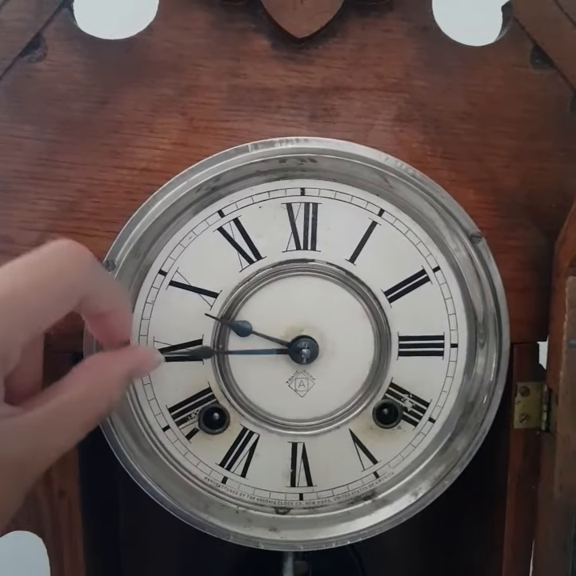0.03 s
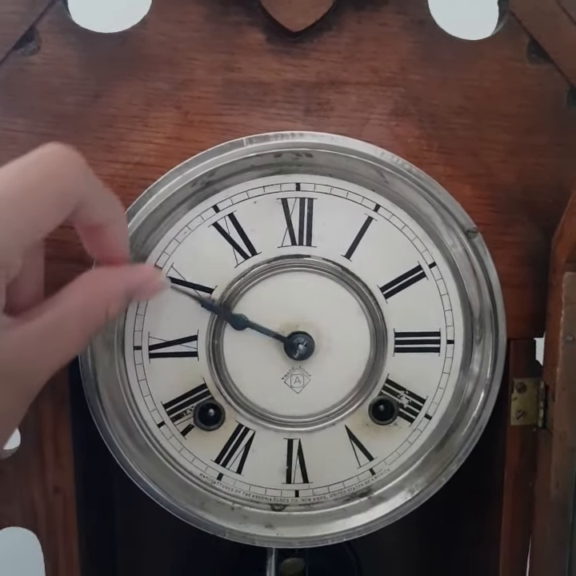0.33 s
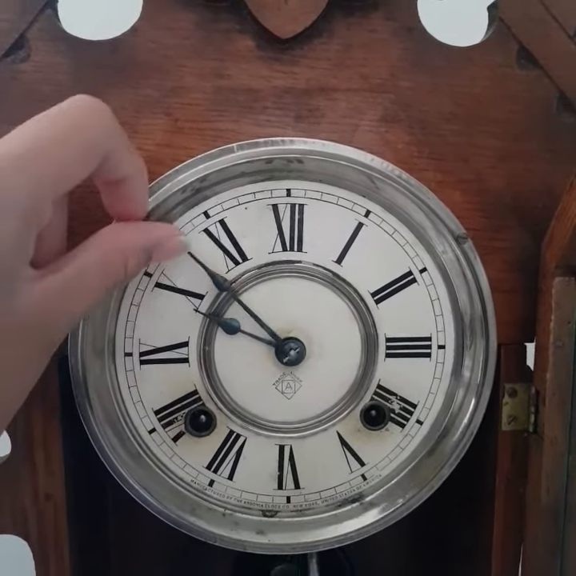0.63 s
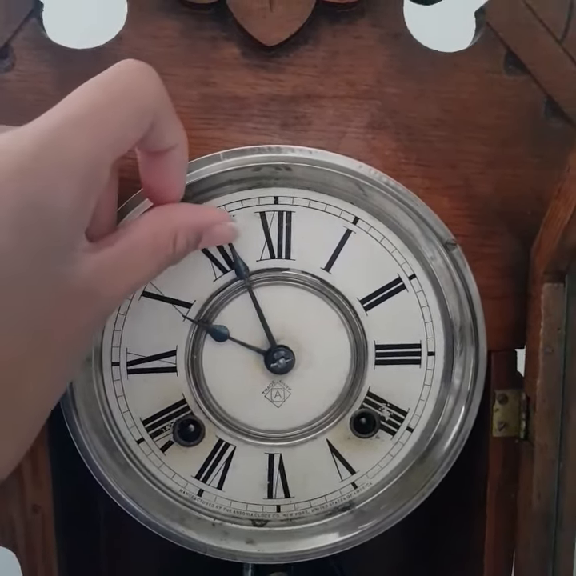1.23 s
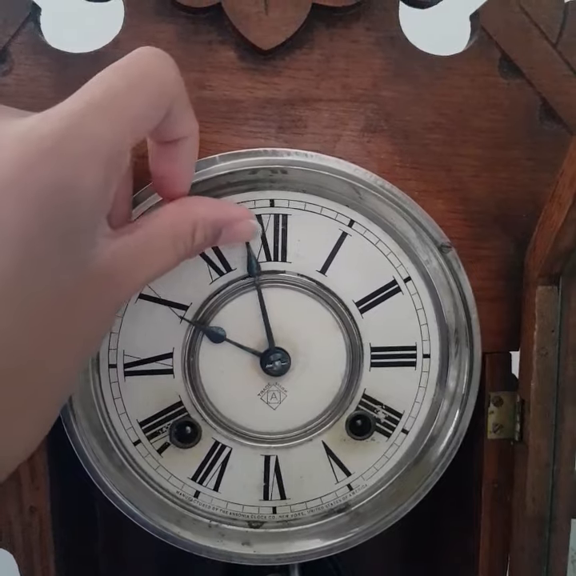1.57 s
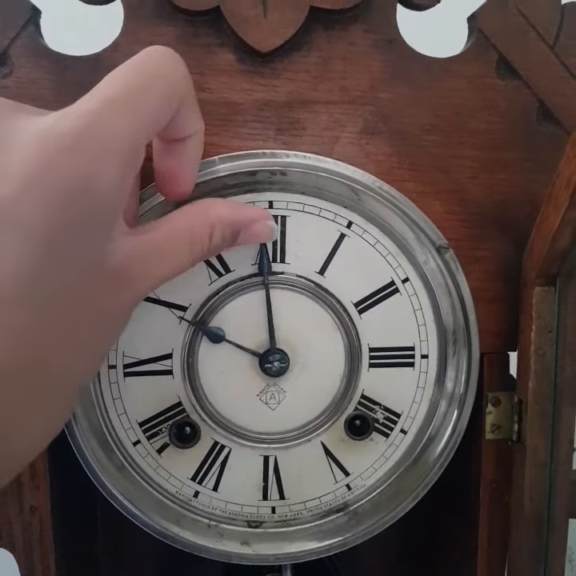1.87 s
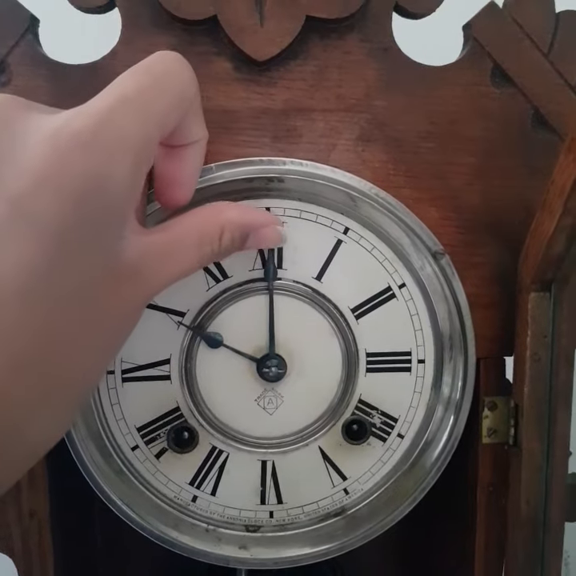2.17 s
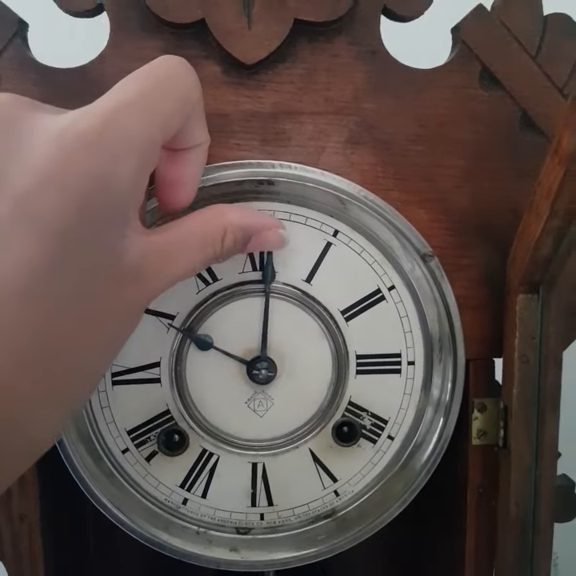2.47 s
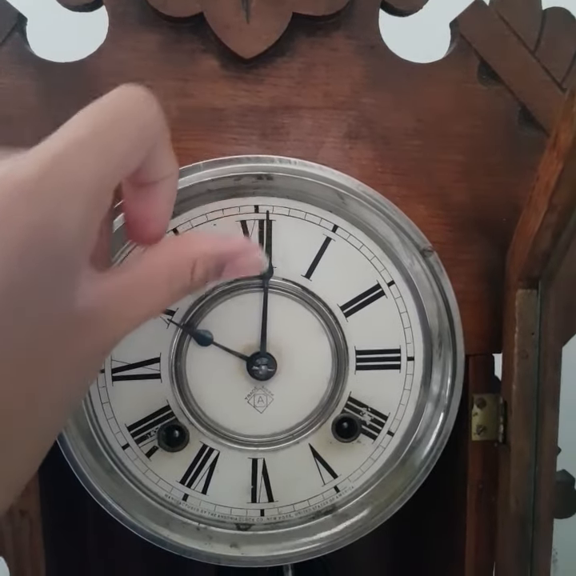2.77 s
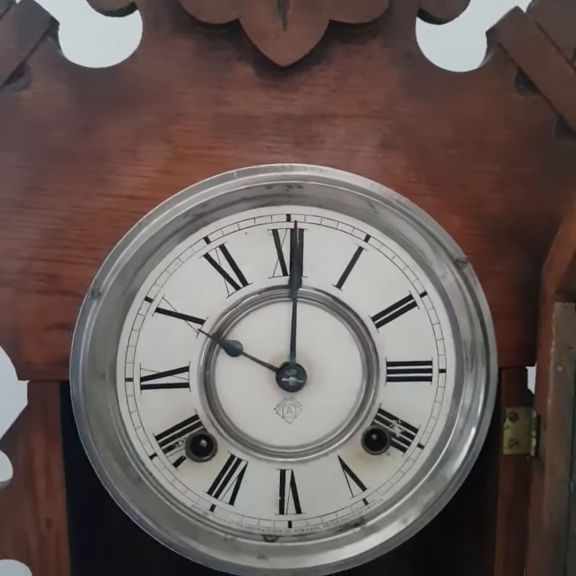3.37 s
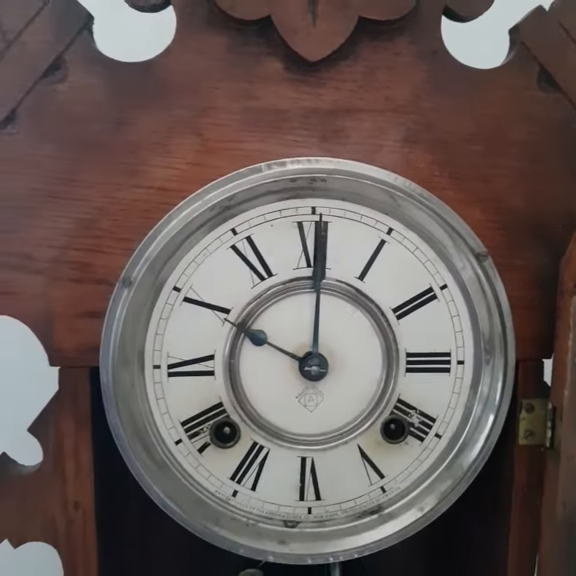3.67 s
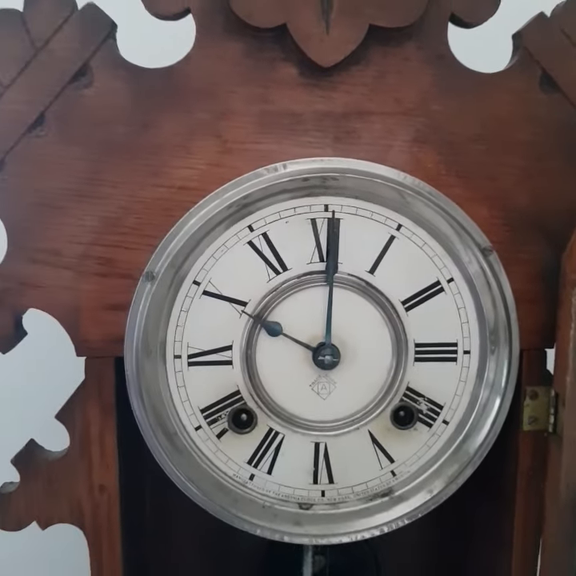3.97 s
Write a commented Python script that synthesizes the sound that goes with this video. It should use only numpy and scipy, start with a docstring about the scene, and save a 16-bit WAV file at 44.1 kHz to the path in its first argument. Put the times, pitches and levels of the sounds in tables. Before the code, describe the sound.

An antique clock ticks close by in a quiet room, over a fading low gong tone. Its gears whirr briefly and stop with a click, then rattle again for longer, and the gong is struck once.

```python
"""A quiet room, with a stereo pair close to an antique mantel clock that is being set forward to the hour.
The pendulum's escapement ticks, a finger rubs as it pushes the minute hand, and the coiled gong still
rings from an earlier stroke. The strike train runs briefly and is caught by the warning lever;
at the hour it is released, the gears whirr and lift the hammer, and the gong is struck."""
import sys
import numpy as np
from scipy import signal
from scipy.fft import rfft, irfft, next_fast_len
from scipy.io import wavfile

SR = 44100
rng = np.random.default_rng(int(sys.argv[2]) if len(sys.argv) > 2 else 0)


def waveform_to_disk(signal):
    """Save audio, clipped to [-1, 1], as 16-bit WAV at the path in sys.argv[1]."""
    frames = np.transpose(np.atleast_2d(signal))
    scaled = np.clip(frames, -1, 1) * 32767
    samples = np.round(scaled).astype(np.int16)
    wavfile.write(sys.argv[1], SR, samples)


N = 176400

# Hammer strokes on the gong. Each row: time in seconds (negative is earlier), gain in dB.
STROKES = [(-2.5, -2), (3.9098, 0)]


def amp(db):
    """Decibels to gain."""
    return 10 ** (np.asarray(db) / 20)


def unit(x):
    """Scale to rms 1."""
    return x / np.sqrt(np.mean(x ** 2) + 1e-20)


def along(points, hz):
    """Read (Hz, value) points on a log frequency axis."""
    freqs, values = np.transpose(points)
    return np.interp(np.log(hz + 1), np.log(freqs + 1), values)


def curve(points):
    """Join (seconds, value) points, one value per sample."""
    return np.interp(np.arange(N) / SR, *np.transpose(points))


def swells(rows):
    """Bell-shaped gain from (centre in seconds, half length in seconds, dB) rows."""
    t = np.arange(N) / SR
    return sum(amp(db) * np.exp(-((t - centre) / half) ** 2) for centre, half, db in rows)


def sides(pan_db):
    """Left and right gains of mean power 1; a positive pan leans left."""
    gains = amp(np.array([pan_db, -pan_db]) / 2)
    return gains / np.sqrt(np.mean(gains ** 2, axis=0))


def filtered(x, response):
    """Pass x through a complex frequency response."""
    n = x.shape[-1]
    size = 2 * next_fast_len(n // 2 + SR // 16)
    return irfft(rfft(x, size) * response(np.fft.rfftfreq(size, 1 / SR)), size)[..., :n]


def colour(points):
    """Minimum-phase response with the gain of (Hz, dB) points."""
    def response(hz):
        cepstrum = irfft(np.log(amp(along(points, hz))))
        half = len(cepstrum) // 2
        return np.exp(rfft(np.r_[cepstrum[0], 2 * cepstrum[1:half], np.zeros(half)]))
    return response


def body(modes):
    """Response of (Hz, width in Hz, dB) resonances, summed with alternating signs."""
    return lambda hz: sum((-1) ** k * amp(db) * 1j * hz * width / (centre**2 - hz**2 + 1j * hz * width)
                          for k, (centre, width, db) in enumerate(modes))


def contact(start, db, response, t60, scrape):
    """A blow and its scrape, dying in t60 seconds, through a response; db is the level over 10 ms."""
    t = np.arange(SR // 6) / SR
    friction = rng.standard_normal(len(t)) * amp(-60 * t / t60)
    push = scrape * friction / np.linalg.norm(friction) + (t == 0)
    ring = filtered(push, response)
    out = np.zeros(N + SR)
    out[round(start * SR):][:len(t)] = amp(db) * ring / np.linalg.norm(ring) * np.sqrt(SR / 100)
    return out[:N]


def background():
    """Room tone: a low wavering rumble, nearly mono, and a faint wide hiss."""
    # Two spectra. Each row: frequency in Hz, relative level in dB.
    rumble_tone = [(20, -10), (34, -19.5), (49, 4), (72, -8), (120, -16), (250, -32.5), (500, -40),
                   (2000, -69)]
    hiss_tone = [(100, 13.5), (500, -5.5), (1400, -3.5), (2300, -4.5), (3500, -11), (5500, -14.5),
                 (7800, -24), (11000, -8), (15500, -6)]
    # The rumble's rise and fall. Each row: time in seconds, level in dB.
    rumble_level = [(0, -61), (.95, -62.5), (1.3, -56.5), (1.9, -58), (2.3, -67), (2.8, -60.5), (4, -59)]
    narrow_noise = rng.standard_normal(N) + 0.16 * rng.standard_normal((2, N))
    rumble = unit(filtered(narrow_noise, colour(rumble_tone)))
    hiss = unit(filtered(rng.standard_normal((2, N)), colour(hiss_tone)))
    return amp(curve(rumble_level)) * rumble + amp(-67) * sides(pan_db=-0.5)[:, None] * hiss


def room(x):
    """The walls return a short diffuse tail, different at each microphone."""
    # Reverberation. Each row: frequency in Hz, seconds to fall 60 dB.
    decay = [(200, 0.33), (2000, 0.17), (4500, 0.14), (12000, 0.078)]
    hz, t, noise = signal.stft(rng.standard_normal((2, SR // 2)), SR, nperseg=256)
    tail = signal.istft(noise * amp(-60 * t / along(decay, hz)[:, None]), SR, nperseg=256)[1]
    return signal.fftconvolve(x[None], tail / np.linalg.norm(tail[0]), axes=1)[:, :N]


def finger():
    """Skin rubs in soft swells as a finger pushes the minute hand."""
    # Rubs. Each row: centre in seconds, half length in seconds, level in dB.
    rubs = [(0.368, 0.037, -65), (0.549, 0.053, -63.5)]
    # Skin friction. Each row: frequency in Hz, relative level in dB.
    skin_tone = [(100, 4), (300, -2), (420, -6), (600, -11.5), (1500, -3.5), (3000, -35), (9000, -33)]
    return swells(rubs) * unit(filtered(rng.standard_normal(N), colour(skin_tone)))


def escapement():
    """Each beat rings the plates and the escape wheel, then a pallet lands with a brighter click."""
    # Each row: start in seconds, plate and wheel levels in dB, pallet delay in seconds, its level in dB.
    beats = [(.178, -48.5, -60, 0.018, -56.5), (.687, -47.5, -69, 0.0042, -70),
             (1.1535, -43.5, -61, 0.0086, -53), (1.661, -50, -68, 0.012, -75),
             (2.131, -47.5, -57, 0.013, -54.5), (2.642, -43, -68, 0.0092, -51.5),
             (3.112, -46, -60, 0.0044, -67), (3.62, -47, -73, 0.0042, -60)]
    # Resonances. Each row: frequency in Hz, width in Hz, gain in dB.
    plate_modes = [(352, 58, -7), (692, 23, 0.5), (816, 23.7, 6.5), (1325, 175, -3.5), (2020, 42, 4.5),
                   (2233, 49, 4.5), (2716, 164, -7), (4200, 640, -16.5)]
    wheel_modes = [(4150, 220, -1), (4526, 160, 2.5)]
    # The pallet's click. Each row: frequency in Hz, relative level in dB.
    pallet_tone = [(300, -25), (900, -19), (2300, 3), (4500, -11), (7500, -15.5), (9300, 3.5), (12000, -6),
                   (14500, -2)]
    return sum(contact(start, plate_db, body(plate_modes), t60=0.087, scrape=1.9)
               + contact(start, wheel_db, body(wheel_modes), t60=0.035, scrape=3)
               + contact(start + delay, pallet_db, colour(pallet_tone), t60=0.058, scrape=4.7)
               for start, plate_db, wheel_db, delay, pallet_db in beats)


def levers():
    """Levers drop, bounce and catch: a thud in the wooden case, their own ring and a dry click."""
    # Each row: start in seconds, then the levels of thud, ring and click in dB.
    landings = [(1.0427, -51, -58, -43.5), (1.0445, -35.5, -56, -43), (1.049, -40.5, -60, -58),
                (2.346, -56.5, -44, -52), (2.369, -55, -44.5, -55), (3.8694, -42, -50, -37.5)]
    # Resonances. Each row: frequency in Hz, width in Hz, gain in dB.
    case_modes = [(229.3, 15, -8), (311, 21, -4), (415.4, 16, -1.5), (574, 11, -1.5), (649, 47, -6),
                  (836, 19, -2), (1310, 990, -27), (2030, 100, -4.5), (2295, 260, -9), (2490, 100, -9.5)]
    lever_modes = [(402, 21, -3.5), (1244, 26, 9), (1890, 280, -13.5), (2140, 200, -11), (2445, 120, -10.5),
                   (5360, 56, -21)]
    # The click. Each row: frequency in Hz, relative level in dB.
    click_tone = [(500, -3.5), (2500, -10.5), (4200, -11.5), (6200, 1), (7800, -11), (10500, 3.5),
                  (12500, -7), (15500, -7)]
    return sum(contact(start, thud_db, body(case_modes), t60=0.05, scrape=0.56)
               + contact(start, ring_db, body(lever_modes), t60=0.044, scrape=1.8)
               + contact(start, click_db, colour(click_tone), t60=0.03, scrape=2.1)
               for start, thud_db, ring_db, click_db in landings)


def tooth_impacts():
    """Gear teeth meet unevenly and chatter in their play, giving a train of impulses."""
    # The train's speed. Each row: time in seconds, teeth per second.
    tooth_rate = [(1.0, 84), (2.4, 63.3), (2.6, 71.4), (3.1, 69), (3.8, 61.8)]
    scatter_s, spread_db, chatter_per_s, chatter_db = 0.0013, 2.6, 1200, -12
    teeth_passed = np.floor(np.cumsum(curve(tooth_rate)) / SR)
    due = np.flatnonzero(np.diff(teeth_passed))
    lateness, force = np.clip(rng.standard_normal((400, 2)), -2, 2)[:len(due)].T
    onsets = np.clip(due + lateness * scatter_s * SR, 0, N - 1).astype(int)
    chatter = amp(chatter_db) * rng.standard_normal(N) * (rng.random(N) < chatter_per_s / SR)
    return np.bincount(onsets, amp(spread_db * force), N) + chatter


def strike_train():
    """Tooth impacts rattle the gears; the dry pivots fizz with every impact and squeak in bursts."""
    # When the train turns. Each row: start and end in seconds.
    runs = [(.7, 1.05), (2.39, 4.0)]
    # Each row: time in seconds, level in dB.
    rattle_level = [(.7, -66), (.76, -64.5), (.86, -64.5), (.95, -55.5), (1.04, -56.5), (1.06, -80),
                    (2.38, -95), (2.41, -63), (2.5, -55.5), (2.72, -49), (2.92, -48), (3.15, -50.5),
                    (3.4, -52), (3.55, -50.5), (3.7, -47.5), (3.86, -44.5)]
    fizz_level = [(.7, -82), (.84, -79.5), (.95, -64.5), (1.04, -66), (1.07, -97), (2.38, -74), (2.42, -71),
                  (2.6, -59.5), (3.0, -58), (3.45, -57), (3.62, -59), (3.86, -56), (3.93, -51)]
    # Resonances. Each row: frequency in Hz, width in Hz, gain in dB.
    gear_modes = [(787, 27, -2.5), (1147, 47, -4.5), (1524, 62, 1), (1784, 125, -6), (1981, 125, 2.5),
                  (2121, 167, 1.5), (2824, 485, -17), (3890, 86, -20.5), (5850, 380, -17.5)]
    pivot_modes = [(10280, 72, 0)]
    # Pivot friction. Each row: frequency in Hz, relative level in dB.
    pivot_tone = [(200, -1), (600, 3.5), (1500, 3), (3500, -20), (5700, 3), (7700, -8.5), (9000, 0.5),
                  (10400, 3.5), (12000, -3), (15500, -7.5)]
    # Each row: centre in seconds, half length in seconds, level in dB.
    squeaks = [(2.725, 0.0092, -60), (2.91, 0.02, -60), (3.02, 0.061, -66), (3.37, 0.024, -67),
               (3.6, 0.013, -61), (3.715, .02, -56.5)]
    impacts = tooth_impacts()
    relax_s = 0.0016  # each impact briefly loads the rubbing surfaces
    load = unit(np.sqrt(signal.lfilter([1], [1, -np.exp(-1 / (relax_s * SR))], impacts ** 2)))
    rattle = unit(filtered(unit(impacts) + 0.69 * load * rng.standard_normal(N), body(gear_modes)))
    grit = (load + 0.11) * rng.standard_normal(N)
    squeak = unit(filtered(grit, body(pivot_modes)))
    fizz = unit(filtered(grit, colour(pivot_tone))) + amp(-10) * squeak
    whirr = amp(curve(rattle_level)) * rattle + amp(curve(fizz_level)) * fizz
    t = np.arange(N) / SR
    turning = sum((t > start) & (t < end) for start, end in runs)
    return turning * (whirr + swells(squeaks) * squeak)


def hard_knocks():
    """Now and then a tooth slams across its play and rings its wheel."""
    # Each row: start in seconds, level in dB.
    knocks = [(.8295, -52), (.929, -53.5), (2.417, -51.5), (2.463, -46), (2.498, -47), (2.53, -48.5),
              (2.6165, -45), (2.692, -46), (2.763, -47), (2.85, -44), (2.9055, -42), (2.9345, -50),
              (3.094, -49), (3.1625, -48), (3.211, -46.5), (3.452, -45), (3.686, -49), (3.829, -54),
              (3.839, -46)]
    # Resonances. Each row: frequency in Hz, width in Hz, gain in dB.
    wheel_modes = [(1583, 93, -11.5), (2013, 203, 1), (2130, 130, 4), (5900, 280, -18)]
    return sum(contact(start, db, body(wheel_modes), t60=0.023, scrape=0.99) for start, db in knocks)


def hammer():
    """The hammer's short buzz against the coil, and the jangle it leaves."""
    # Two spectra. Each row: frequency in Hz, relative level in dB.
    buzz_tone = [(100, -35), (350, 17.5), (1200, -5), (2200, 3), (4000, -19), (7500, -17), (9000, -21),
                 (10000, 11.5), (11500, -22), (15500, -11)]
    jangle_tone = [(100, -27), (400, -8), (2200, -5), (3200, -15), (5000, -16), (8000, -26), (10000, -8),
                   (14000, -1), (15500, -22)]
    start, db = STROKES[-1]
    buzz = contact(start, db - 26.5, colour(buzz_tone), t60=0.042, scrape=11)
    jangle = contact(start, db - 43, colour(jangle_tone), t60=0.4, scrape=21.2)
    return buzz + jangle


def gong_modes():
    """The coil has long low modes and brief upper ones spaced as in a stiff rod; each beats with a twin."""
    # Each row: frequency in Hz, level in dB, seconds to fall 60 dB, left over right in dB.
    low_modes = [(156.3, -46, 11, -6), (198.2, -46, 9.8, 8.5), (241.6, -37.5, 7.4, -4),
                 (288, -38.5, 4.3, 4), (341, -31, 3.4, -6), (400, -31.5, 3.1, -7), (458, -36.5, 3.4, -10),
                 (528, -36.5, 3.0, 1), (599, -36.5, 3.4, -3), (676, -30.5, 3.0, -5), (754, -42, 4.3, 1),
                 (840, -43.5, 3.2, -2), (929, -41.5, 4.2, -3), (1018, -42, 8.4, -2),
                 (1115, -31.7, 8.78, -6.5), (1214, -34, 10.4, -16), (1315, -47, 11.5, -3.5),
                 (1412, -49, 6.5, -11), (1532, -40, 7.2, -14), (1648, -46, 4.6, -2), (1765, -39, 6.2, -27),
                 (1886, -48, 7.6, -10), (2012, -33, 6.76, -21.5), (2141, -36.3, 7.5, -30),
                 (2272, -37.7, 7.7, -30), (2406, -48, 5.6, -7), (2541, -54, 6.2, -2),
                 (2686, -45.5, 4.6, -19), (2832, -41, 3.6, -13), (2982, -45.5, 3.0, -7),
                 (3133, -43.5, 2.8, -16), (3289, -46, 2, -22)]
    # Spacing of the upper modes. Each row: mode number, frequency in Hz.
    ladder = [(0, 3440), (6, 4440), (37, 11619), (49, 15195)]
    # Their strength. Each row: frequency in Hz, relative level in dB.
    upper_level = [(3440, -64), (3770, -56), (4150, -56), (4900, -65), (5500, -58), (6300, -65),
                   (7200, -68), (8200, -59), (9700, -55), (10600, -53), (12200, -47), (14500, -50),
                   (15300, -61)]
    # Their place between the microphones. Each row: frequency in Hz, left over right in dB.
    upper_pan = [(3900, 2), (5800, -3), (12000, -8)]
    upper_t60, lift_db, scatter_db = 0.5, 3, 2
    twin_ratio, twin_db = 0.989, -13
    number, rung_hz = np.transpose(ladder)
    upper_hz = np.interp(np.arange(number[-1] + 1), number, np.sqrt(rung_hz)) ** 2
    level_scatter, pan_scatter = scatter_db * rng.standard_normal((len(upper_hz), 2)).T
    levels = lift_db + along(upper_level, upper_hz) + level_scatter
    pans = along(upper_pan, upper_hz) + pan_scatter
    modes = list(low_modes) + [(hz, db, upper_t60, pan) for hz, db, pan in zip(upper_hz, levels, pans)]
    return modes + [(hz * twin_ratio, db + twin_db, t60, pan) for hz, db, t60, pan in modes]


def gong():
    """Each stroke rings the coil's modes, which reach each microphone with their own level and phase."""
    attack_s = 0.0027
    hz, db, t60, pan_db = np.transpose(gong_modes())
    phase = rng.uniform(0, 2 * np.pi, len(hz))
    left_shift = rng.normal(0, 1, len(hz)) * np.minimum(hz / 800, 1.3)
    at_mics = amp(db) * sides(pan_db) * np.exp(1j * np.array([phase + left_shift, phase]))
    pole = 2j * np.pi * hz - np.log(1000) / t60
    block = int(np.sqrt(N))  # the decaying sines are summed block by block
    within_block = np.exp(np.outer(pole, np.arange(block) / SR))
    out = np.zeros((2, N))
    for start, stroke_db in STROKES:
        t = np.arange(max(round(start * SR), 0), N) / SR - start
        block_starts = at_mics[:, None] * np.exp(np.outer(t[::block], pole))
        ring = (block_starts @ within_block).real.reshape(2, -1)[:, :len(t)]
        out[:, -len(t):] += amp(stroke_db) * ring * (1 - np.exp(-t / attack_s))
    return out


def scene():
    """The movement is nearer the right microphone; the gong and the room tone spread across both."""
    # The movement's balance. Each row: frequency in Hz, left over right in dB.
    balance = [(100, -1), (380, -8), (700, -8), (1300, -10), (2300, -15.5), (4400, -9), (8000, -10),
               (15000, -10.5)]
    left_lag_s, room_db = 0.00007, -5.5
    works = escapement() + levers() + strike_train() + hard_knocks() + hammer() + finger()
    direct = filtered(works, lambda hz: np.exp(np.array([[-1j], [1j]]) * np.pi * hz * left_lag_s))
    placed = filtered(direct + amp(room_db) * room(works), lambda hz: sides(along(balance, hz)))
    return placed + gong() + background()


def record(dry):
    """A steep low-pass cuts off the highest treble."""
    top_hz = 15600
    return filtered(dry, lambda hz: 1 / np.sqrt(1 + (hz / top_hz) ** 160))


dry = scene()
out = record(dry)
waveform_to_disk(out)
```